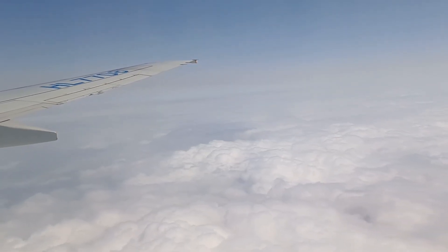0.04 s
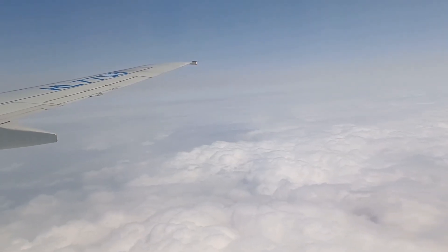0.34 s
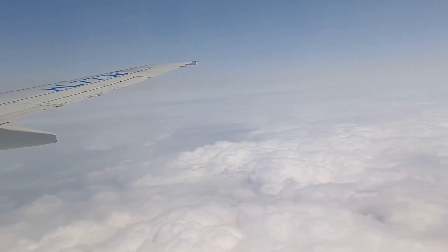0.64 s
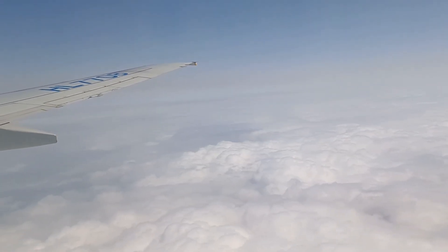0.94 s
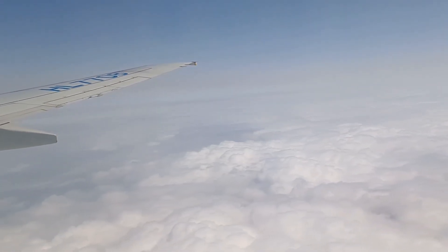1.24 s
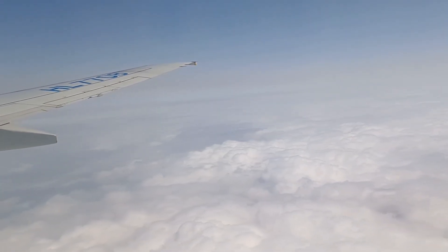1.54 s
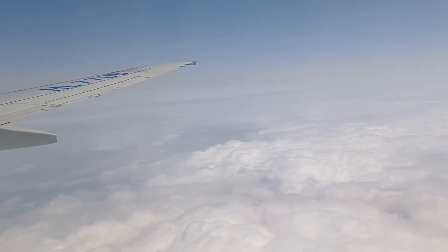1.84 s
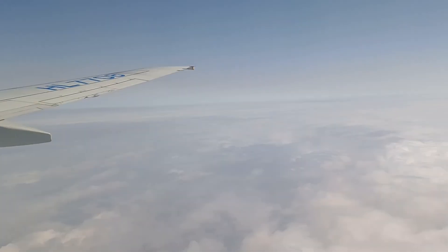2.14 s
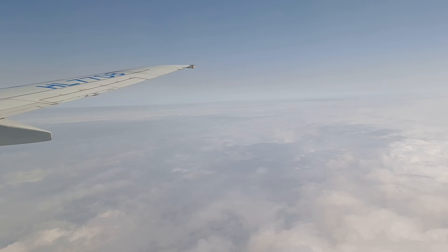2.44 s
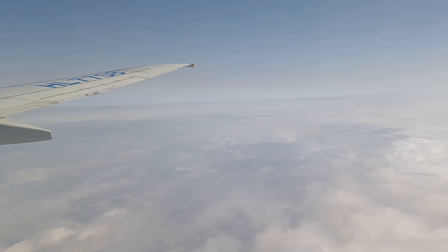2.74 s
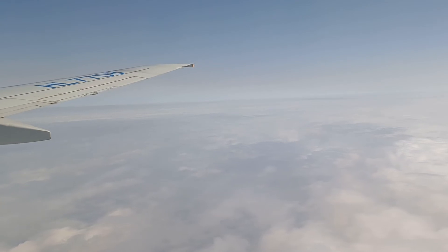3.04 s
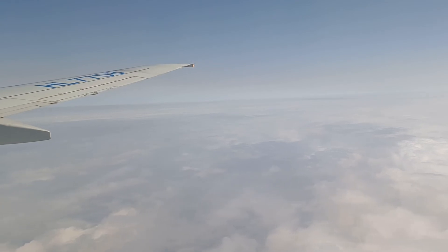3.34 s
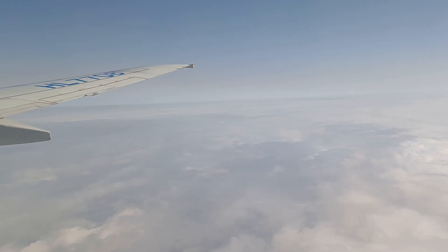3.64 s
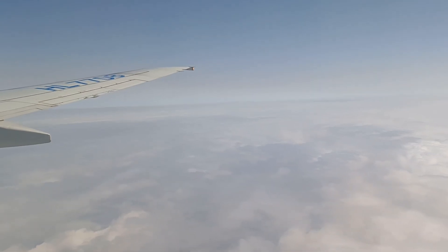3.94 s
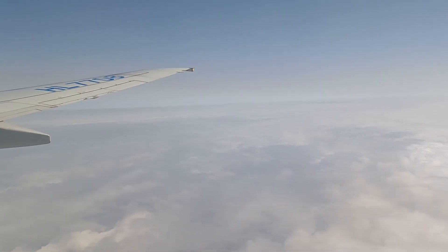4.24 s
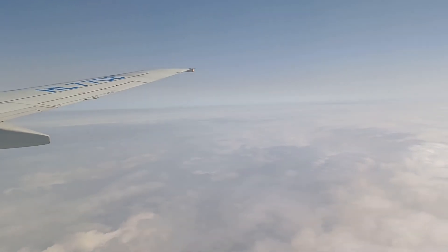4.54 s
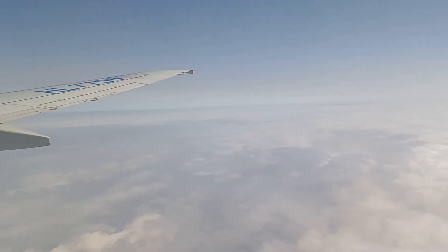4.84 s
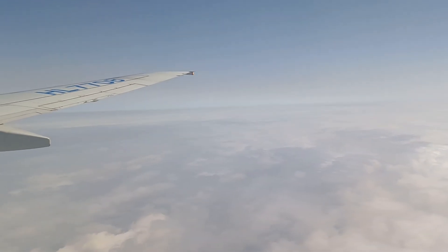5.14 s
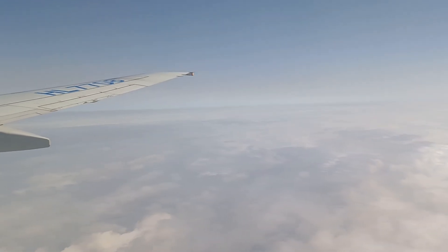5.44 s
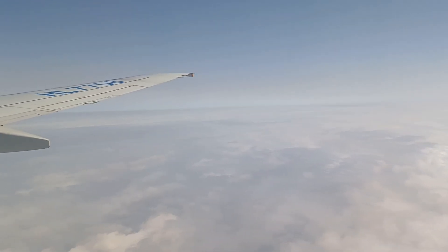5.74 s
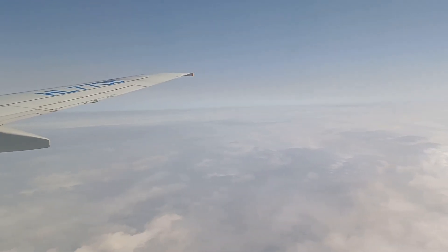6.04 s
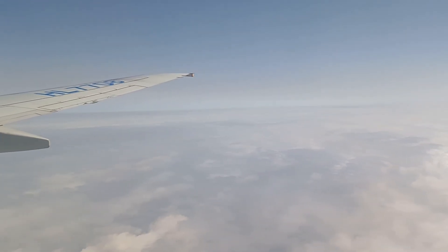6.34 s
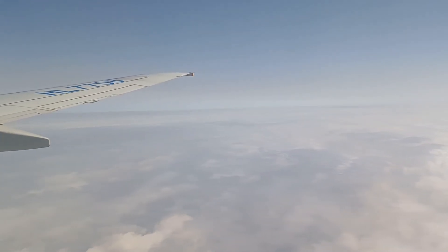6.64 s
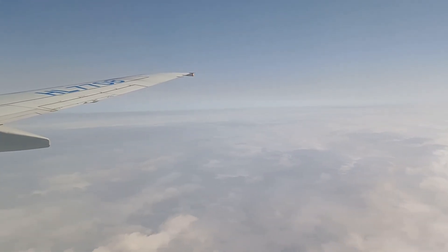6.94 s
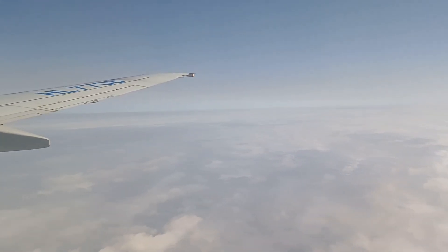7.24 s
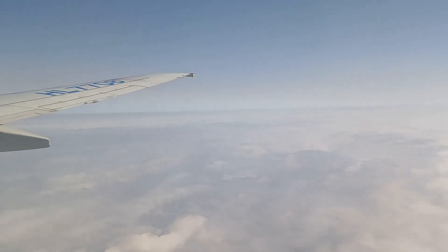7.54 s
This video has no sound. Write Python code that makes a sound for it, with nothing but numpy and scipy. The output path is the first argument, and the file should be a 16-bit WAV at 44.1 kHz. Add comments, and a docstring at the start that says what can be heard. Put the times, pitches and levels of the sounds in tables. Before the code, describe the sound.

Inside a cruising passenger jet, a low rumble and gently throbbing engine drone run under a muffled hiss of air, heard from a window seat. A tiny tick sounds close on the right, and soft booms swell within the rumble. Around five seconds in, the noise sinks, then returns a little quieter and duller, with a low boom and a faint whistle from the air ducts.

```python
"""Window seat in a cruising airliner

Rough air shakes the fuselage into a rumble, the engines drone and air hisses along the skin.
Around five seconds the cabin noise sinks once, then comes back duller, with a boom and a faint
whistle of the air ducts; "early" and "late" mean before and after this dip. Softer booms come
and go, and a few tiny ticks and faint rustles sound close by on the right."""
import sys
import numpy as np
from scipy import signal
from scipy.fft import rfft, irfft
from scipy.io import wavfile
from scipy.ndimage import uniform_filter1d

SR = 44100
rng = np.random.default_rng(int(sys.argv[2]) if len(sys.argv) > 2 else 0)


def generate_wav(signal):
    """Clip the signal to [-1, 1] and save it as 16-bit WAV at the path in sys.argv[1]."""
    frames = np.transpose(np.atleast_2d(signal))
    scaled = np.clip(frames, -1, 1) * 32767
    pcm = np.round(scaled).astype(np.int16)
    wavfile.write(sys.argv[1], SR, pcm)


N = 334719
TIME, HZ = np.arange(N) / SR, np.fft.rfftfreq(N, 1 / SR)

# Tone colours of the fuselage rumble, the air hiss and its fizzy top: f/Hz, relative level/dB
RUMBLE_COLOUR_EARLY = [(22, -20.5), (33, -13), (46, 2), (100, 5), (140, 4.5), (162, 9.5), (180, 0),
                       (197, 4.5), (225, 3.5), (255, 3), (305, 6.5), (345, -4), (382, 2.5), (440, -16),
                       (520, -15.5), (800, -68.5)]
RUMBLE_COLOUR_LATE = [(22, -43), (35, -28), (49, -4), (72, -3.5), (110, -1.5), (162, 5), (188, -1.5),
                      (225, -1.5), (258, -6), (305, -1), (360, -10.5), (420, -15.5), (480, -20.5),
                      (800, -78)]
HISS_COLOUR_EARLY = [(300, -11), (450, 6.5), (530, 5.5), (650, -0.5), (850, -9.5), (1100, -13),
                     (1500, -19.5), (2400, -24.5), (3000, -29.5), (4500, -39), (7000, -71.5)]
HISS_COLOUR_LATE = [(300, -9.5), (480, 0), (650, -1.5), (900, -9.5), (1200, -21), (1700, -30),
                    (2600, -34.5), (3200, -40.5), (3900, -43), (5000, -56), (7000, -76)]
FIZZ_COLOUR = [(2000, -10), (3500, 1), (4500, 3.5), (5400, 3), (6300, -3.3), (7000, -2.5), (7500, .5),
               (8900, -6.8), (10200, -5.8), (11800, -1.5), (15500, -9)]  # rippled by the microphone openings
# Treble that the late fizz loses: f/Hz, level change/dB
FIZZ_DULLING = [(8000, 0), (13000, -2.5), (15500, -6)]
# How the sound leans to one side: f/Hz, left minus right level/dB
PAN_EARLY = [(40, -4.5), (125, 1.5), (300, -1.5), (520, -4.5), (650, -3), (820, -6), (1100, -4), (1480, -7),
             (1900, -6.5), (2400, -7.5), (3100, -2), (4500, -3.5)]
PAN_LATE = [(40, 6.5), (125, 2.5), (250, -4), (620, -1), (780, 2), (950, -3), (1450, -3), (2200, 0.5),
            (4400, -1)]
PAN_FIZZ = [(3200, -1), (4500, -6), (6000, -2.5), (7600, -6.5), (9000, 0), (11300, -3.5), (15000, 0)]
# Short waves reach left and right out of step: f/Hz, likeness (1 = same, 0 = unrelated)
STEREO_LIKENESS = [(50, .99), (350, .95), (480, .63), (650, .25), (900, -.2), (1600, 0), (2400, -.2),
                   (3500, 0)]
# Early engine tones: f/Hz, width/Hz, level against the rumble/dB
ENGINE_HUMS = [(79.67, 0.76, -12.5), (313.3, 12, -9.5)]
# Ringing of the air ducts: f/Hz, width/Hz, level against the hiss/dB
DUCT_TONES_EARLY = [(800, 30, -22), (925, 10, -26), (1480, 25, -33), (3780, 12, -50)]
DUCT_TONES_LATE = [(645, 18, -12), (865, 25, -18), (1394, 20, -23.3), (1485, 22, -29), (2020, 30, -35),
                   (2550, 140, -37.5), (3800, 200, -42), (4450, 200, -46)]
# Ticks: t/s, relative level/dB, left minus right level/dB, bass boost/dB
TICK_EVENTS = [(.2497, -37.5, -22, 1.5), (.3645, -52, -10, -4), (4.4522, -54, -7, -12),
               (4.5907, -48, -11, -17), (5.497, -65, -7, 0), (6.0385, -58, -7, 3)]
# Tone colour of ticks and rustles: f/Hz, relative level/dB
CRISP_COLOUR = [(300, -15), (1300, -4), (2500, 2), (6000, -2), (12000, 0), (16000, -2)]
# Rustles at their peaks: t/s, fade time/s, relative level/dB
RUSTLE_EVENTS = [(.66, .05, -81.5), (1.45, .08, -84.5), (2.675, .05, -79)]
# Cabin booms at their peaks: t/s, fade time/s, f/Hz, level/dB
BOOM_EVENTS = [(1.568, 0.038, 122, -27.5), (2.11, 0.087, 128.3, -29), (2.735, 0.075, 157.3, -29),
               (6.162, 0.095, 126.6, -21.5), (6.166, 0.18, 159.5, -30), (6.877, .11, 130.6, -30.5)]


def gain_of(db):
    """Turns decibels into a factor to multiply a sound by."""
    return 10 ** (np.asarray(db) / 20)


def curve(points, hz=HZ):
    """Joins a table's points with straight lines on a log-frequency axis."""
    f, value = np.transpose(points)
    return np.interp(np.log(hz + 1), np.log(f + 1), value)


def ramp(start_s, end_s):
    """Goes evenly from 0 to 1 between two times."""
    return np.clip((TIME - start_s) / (end_s - start_s), 0, 1)


def wander(samples):
    """A random drift, typically of size 1, that changes over this many samples."""
    drift = uniform_filter1d(rng.standard_normal(N), samples)
    return drift / np.std(drift)


def resonance(hz, width_hz):
    """A tone colour that favours one pitch and falls away on both sides."""
    return 1 / (1 + ((HZ - hz) / width_hz) ** 2)


def cabin_noise(colour, pan):
    """Stereo noise of power 1: left and right are alike in the bass, unrelated in the treble."""
    a, b, c, d = rng.standard_normal((4, len(HZ)))
    likeness = curve(STEREO_LIKENESS)
    left = a + 1j * b
    right = likeness * left + np.sqrt(1 - likeness ** 2) * (c + 1j * d)
    tilt = gain_of(curve(pan) / 2)
    pair = irfft(np.array([left * tilt, right / tilt]) * colour, N)
    return pair / np.std(pair.mean(0))


def steadied(pair, samples):
    """Evens out the slow swells of a noise and leaves its quick flutter."""
    power = uniform_filter1d(uniform_filter1d(pair.mean(0) ** 2, samples), samples)
    return pair / np.sqrt(power + 1e-12)


def fuzzy_tones(rows, pan):
    """Adds up tones, each a narrow band of noise."""
    return sum(gain_of(db) * cabin_noise(resonance(hz, width), pan) for hz, width, db in rows)


def fuselage_rumble(early, late, early_db=-26, late_db=-29.5):
    """Rough air shakes the panels; the cabin favours a few broad bands, with engine tones among them."""
    before = steadied(cabin_noise(gain_of(curve(RUMBLE_COLOUR_EARLY)), PAN_EARLY), samples=7000)
    after = steadied(cabin_noise(gain_of(curve(RUMBLE_COLOUR_LATE)), PAN_LATE), samples=7000)
    before += fuzzy_tones(ENGINE_HUMS, PAN_EARLY)
    return early * gain_of(early_db) * before + late * gain_of(late_db) * after


def engine_drone(early, late, early_db=-32, late_db=-34, throb_db=1.0):
    """The engines' main note, a narrow band of noise that throbs at random."""
    before = steadied(cabin_noise(resonance(hz=125, width_hz=8), PAN_EARLY), samples=6000)
    after = steadied(cabin_noise(resonance(hz=130.5, width_hz=5), PAN_LATE), samples=6000)
    throb = gain_of(throb_db * wander(samples=6000))
    return throb * (early * gain_of(early_db) * before + late * gain_of(late_db) * after)


def air_hiss(early, late, early_db=-47, late_db=-50.5):
    """Air rushes along the skin, muffled by the cabin lining, and the air ducts ring with it."""
    before = cabin_noise(gain_of(curve(HISS_COLOUR_EARLY)), PAN_EARLY)
    before += fuzzy_tones(DUCT_TONES_EARLY, PAN_EARLY)
    after = cabin_noise(gain_of(curve(HISS_COLOUR_LATE)), PAN_LATE)
    after += fuzzy_tones(DUCT_TONES_LATE, PAN_LATE)
    return early * gain_of(early_db) * before + late * gain_of(late_db) * after


def air_fizz(early, late, early_db=-78.7, late_db=-87, flicker_db=.5):
    """The faint, highest part of the air noise, flickering a little."""
    flicker = gain_of(flicker_db * wander(samples=3000))
    before = cabin_noise(gain_of(curve(FIZZ_COLOUR)), PAN_FIZZ)
    after = cabin_noise(gain_of(curve(FIZZ_COLOUR) + curve(FIZZ_DULLING)), PAN_FIZZ)
    return flicker * (early * gain_of(early_db) * before + late * gain_of(late_db) * after)


def ticks(decay_s=0.00034, release_s=.002, catch_db=-13, grit=0.33, boost_db=9.5):
    """Tiny dry snaps with a gritty edge: a faint catch, then the release a moment later."""
    out, t = np.zeros((2, N)), np.arange(512) / SR
    hz = np.fft.rfftfreq(len(t), 1 / SR)
    bass_share = np.clip(1 - hz / 11000, 0, 1)
    for at_s, db, pan_db, bass_db in TICK_EVENTS:
        tails = grit * np.exp(-t / decay_s) * rng.standard_normal((2, 2, len(t)))
        catch, release = (t == 0) + tails  # each is a spike with a noisy tail
        snap = gain_of(catch_db) * np.roll(catch, 8, axis=1)
        snap += np.roll(release, round(release_s * SR), axis=1)
        colour = gain_of(curve(CRISP_COLOUR, hz) + bass_db * bass_share)
        snap = irfft(rfft(snap) * colour)
        snap *= gain_of([[pan_db / 2], [-pan_db / 2]])
        start = round(at_s * SR)
        out[:, start:start + len(t)] += gain_of(db + boost_db) * snap / np.linalg.norm(snap.mean(0))
    return out


def rustles(grain_db=3):
    """Brief grainy brushes close by, as bright as the ticks."""
    strokes = sum(gain_of(db) * np.exp(-((TIME - peak_s) / fade_s) ** 2)
                  for peak_s, fade_s, db in RUSTLE_EVENTS)
    grain = gain_of(grain_db * wander(samples=150))
    return strokes * grain * cabin_noise(gain_of(curve(CRISP_COLOUR)), PAN_FIZZ)


def cabin_booms(width_hz=12):
    """In each boom, a low ringing of the cabin briefly swells and fades."""
    out = np.zeros((2, N))
    for peak_s, fade_s, hz, db in BOOM_EVENTS:
        ring = steadied(cabin_noise(resonance(hz, width_hz), PAN_LATE), samples=4000)
        out += gain_of(db) * np.exp(-((TIME - peak_s) / fade_s) ** 2) * ring
    return out


def dip_and_swell(dip_db=12, bottom_s=5.343, bend=1.3, swell_db=3):
    """The level sinks once, comes back, and rises a little at the very end."""
    sink = ramp(start_s=4.53, end_s=bottom_s)
    recover = ramp(start_s=bottom_s, end_s=5.964)
    dip = (sink * (1 - recover)) ** bend
    swell = ramp(start_s=7.38, end_s=7.52)
    return gain_of(swell_db * swell - dip_db * dip)


def scene(air_rise_db_per_s=0.22, rise_end_s=4.53):
    """The steady sounds dip together and turn duller; booms, ticks and rustles go on top."""
    blend = ramp(start_s=4.74, end_s=5.66) * np.pi / 2
    early, late = np.cos(blend), np.sin(blend)  # one fades out as the other fades in
    early_air = early * gain_of(air_rise_db_per_s * np.minimum(TIME - rise_end_s, 0))
    cabin = fuselage_rumble(early, late) + engine_drone(early, late)
    cabin += air_hiss(early_air, late) + air_fizz(early_air, late)
    return dip_and_swell() * cabin + cabin_booms() + ticks() + rustles()


def record(dry):
    """Fades in quickly, then trims the deepest bass and the highest treble."""
    fade_s, low_cut_hz, high_cut_hz = .004, 37, 15720
    fade_in = np.sin(np.pi / 2 * ramp(0, fade_s)) ** 2
    bass_cut = signal.butter(6, low_cut_hz, "high", fs=SR, output="sos")
    treble_cut = signal.firwin(511, high_cut_hz, window=("kaiser", 9), fs=SR)
    trimmed = signal.sosfilt(bass_cut, dry * fade_in)
    return signal.oaconvolve(trimmed, treble_cut[None], "same")


dry = scene()
out = record(dry)
generate_wav(out)
```